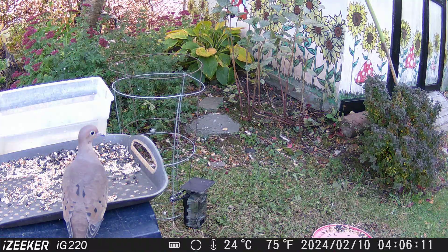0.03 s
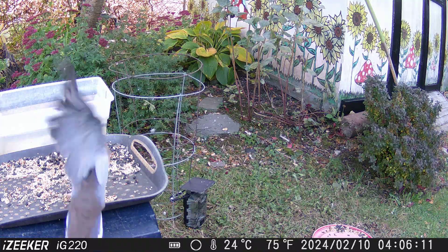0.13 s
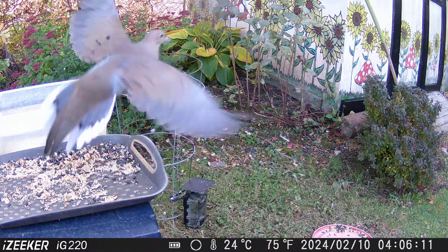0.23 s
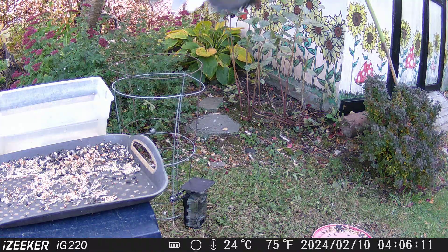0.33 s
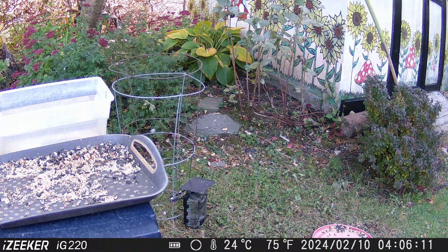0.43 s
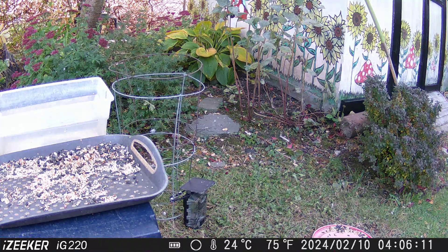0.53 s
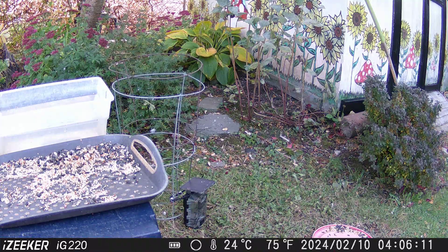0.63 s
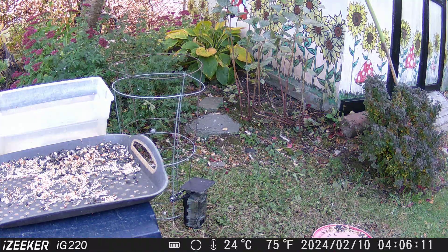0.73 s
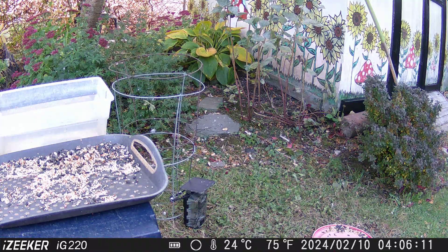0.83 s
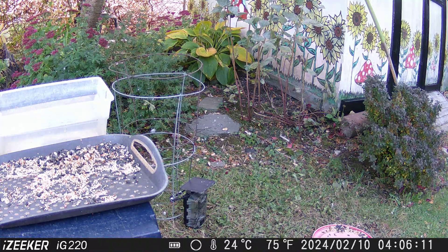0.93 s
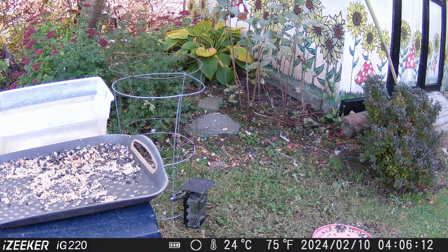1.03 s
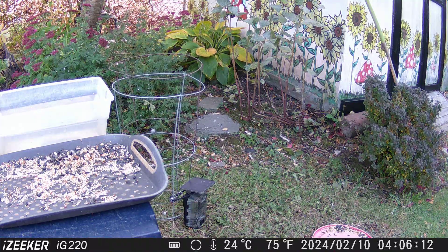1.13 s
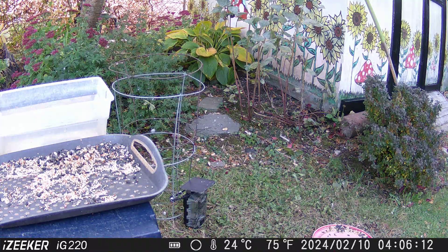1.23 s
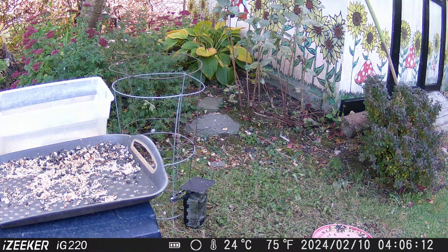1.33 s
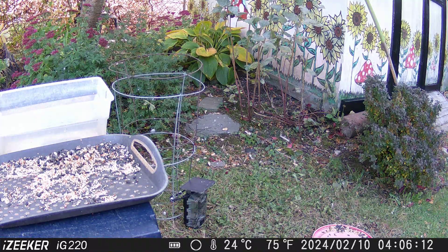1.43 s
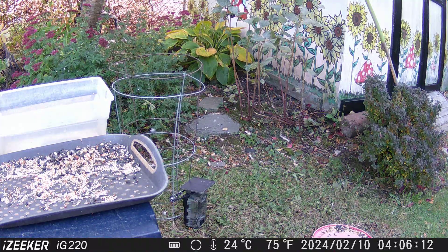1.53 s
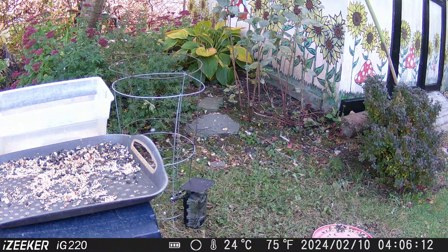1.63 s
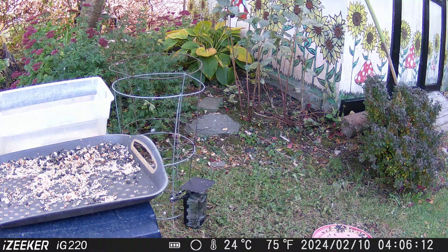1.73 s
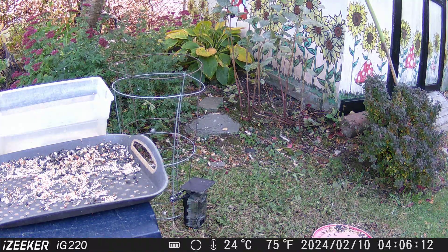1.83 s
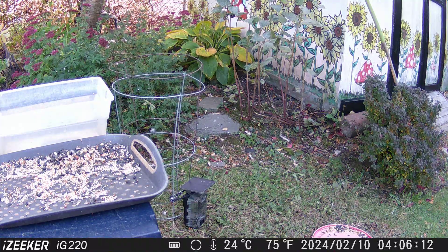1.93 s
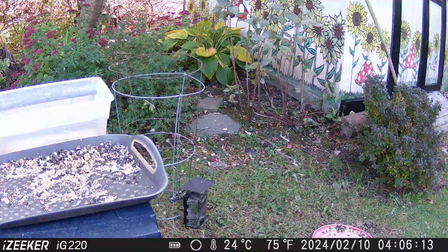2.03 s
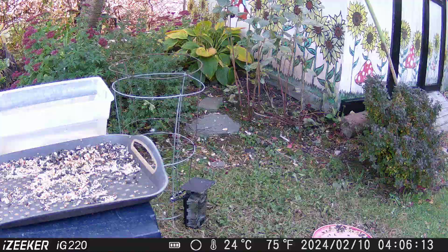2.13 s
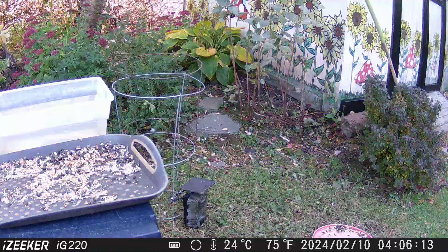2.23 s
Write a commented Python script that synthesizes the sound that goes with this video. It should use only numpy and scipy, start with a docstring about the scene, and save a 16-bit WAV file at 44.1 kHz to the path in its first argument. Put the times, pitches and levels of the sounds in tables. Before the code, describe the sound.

Dove wings flap hard right beside a small microphone in a garden, with claps, low air thuds, feather rustle and quick airy whistles, then the flutter recedes, leaving soft rumble and a few dull knocks.

```python
"""Doves leaving a garden feeder

Close to a small microphone, doves burst up from a garden feeder and fly off.
Wing strokes push low pressure pulses, feathers whistle in wavering harmonic tones, wing tips clap in noise.
Shaped noise makes the feather rustle and the outdoor rumble, part steady and part swelling;
decaying sines make dull thumps."""
import sys
import numpy as np
from scipy import signal
from scipy.fft import rfft, irfft
from scipy.io import wavfile
from scipy.ndimage import uniform_filter1d

SR = 44100
rng = np.random.default_rng(int(sys.argv[2]) if len(sys.argv) > 2 else 0)


def store_wav(level_fs):
    """Save 16-bit WAV to argv[1]."""
    pcm = np.round(np.clip(np.atleast_2d(level_fs), -1, 1) * 32767)
    wavfile.write(sys.argv[1], SR, pcm.T.astype(np.int16))


N = 101430  # samples, 2.3 s


def amp(db):
    """Amplitude factor for a level in dB."""
    return 10 ** (np.asarray(db) / 20)


def evened(x):
    """Scales to rms 1."""
    return x / np.sqrt(np.mean(x ** 2) + 1e-20)


def read(points, hz):
    """Reads a tone curve in dB, interpolated over log frequency."""
    f, value = np.transpose(points)
    return np.interp(np.log(hz + 1), np.log(f + 1), value)


def add(mix, start_s, sound):
    """Adds a sound in place, cut off at the end of the mix."""
    part = mix[max(round(start_s * SR), 0):][:len(sound)]
    part += sound[:len(part)]


def colour(x, points):
    """Filters by a tone curve in dB."""
    gain = amp(read(points, np.fft.rfftfreq(len(x), 1 / SR)))
    return irfft(rfft(x) * gain, len(x))


def drift(seconds):
    """Smooth random curve of rms 1, averaged twice over the given time."""
    size = max(round(seconds * SR), 2)
    once = uniform_filter1d(rng.standard_normal(N), size)
    return evened(uniform_filter1d(once, size))


def hiss(points, patch_db, flicker_db, size, bright_db=0):
    """Noise with drifting patches, a flicker shared by all bands and a tilt in dB per octave above 2 kHz."""
    hop = size // 4
    hz = np.fft.rfftfreq(size, 1 / SR)[:, None]
    real, imaginary, patches = rng.standard_normal((N // hop + 5, size // 2 + 1, 3)).T
    frames = real.shape[1]
    patches = uniform_filter1d(patches, size=6, axis=0)  # across frequency
    patches = evened(uniform_filter1d(patches, size=6, axis=1))  # across time
    flicker = evened(uniform_filter1d(rng.standard_normal(frames), size=3))
    bright = np.interp(np.arange(frames) * hop, np.arange(N), bright_db * np.ones(N))
    tilt = np.log2(np.maximum(hz / 2000, 1)) * bright
    level_db = read(points, hz) + patch_db * patches + flicker_db * flicker + tilt
    spectrum = (real + 1j * imaginary) * amp(level_db)
    return signal.istft(spectrum, nperseg=size, noverlap=size - hop)[1][:N]


# outdoor air around the feeder, relative tone curve: (pitch_hz, level_db)
AIR_TONE = [(20, -1.5), (60, -6), (150, -14.5), (260, -20), (500, -25), (1000, -22.5), (1600, -31),
            (2400, -33.5), (4500, -36), (9000, -51.5)]


def air():
    """Steady outdoor rumble: noise weighted to the lows."""
    return amp(-52) * evened(hiss(AIR_TONE, patch_db=2, flicker_db=-0.5, size=2048))


# swelling low outdoor rumble, level followed point to point: (start_s, level_db)
SWELL_LEVELS = [(0.0, -44), (0.15, -47), (0.36, -39), (0.51, -50), (0.72, -49.5), (1.0, -49.5),
                (1.26, -51.5), (1.48, -52.5), (1.73, -55.5), (1.91, -47), (2.06, -52), (2.2, -49.5),
                (2.3, -48)]
# relative tone curve of the swelling rumble: (pitch_hz, level_db)
SWELL_TONE = [(20, -3), (50, 3.5), (90, 1), (150, -8.5), (250, -17), (500, -39), (1000, -66)]


def swelling_rumble():
    """Outdoor rumble below about 200 Hz that rises and falls: low noise under a level curve."""
    start_s, level_db = np.transpose(SWELL_LEVELS)
    level = amp(np.interp(np.arange(N) / SR, start_s, level_db))
    return level * evened(hiss(SWELL_TONE, patch_db=.7, flicker_db=.7, size=2048))


# feather rustle of the flock, followed point to point: (start_s, level_db, brightness_db_per_octave)
RUSTLE_LEVELS = [(0, -62, 2), (.15, -60, 1.5), (.19, -50, 0), (.235, -51, -1.5), (.26, -39.5, -2),
                 (.29, -44, -2.5), (.33, -36, -6), (.36, -44, -3), (.4, -46, -3), (.45, -49, 1),
                 (.55, -60, 1.5), (.68, -50.5, -2), (.74, -42.5, -2.5), (.8, -52.5, -0.5), (.86, -36.5, -8),
                 (.94, -49.5, 0), (1.1, -50, 0.5), (1.3, -57, 0.5), (1.46, -59.5, 1), (1.6, -65.5, 1),
                 (1.8, -56, -2), (2.05, -59.5, -0.5), (2.18, -56.5, -1), (2.3, -72, 2.5)]
# relative tone curve of the rustle: (pitch_hz, level_db)
RUSTLE_TONE = [(60, 4.5), (200, 14.5), (600, -3.5), (1500, 1), (2400, -1), (4000, 1), (7000, 3.5),
               (9000, 11)]


def rustle():
    """Air through the feathers: noise that swells and shifts in brightness above 2 kHz."""
    start_s, level_db, bright_db = np.transpose(RUSTLE_LEVELS)
    t = np.arange(N) / SR
    sound = hiss(RUSTLE_TONE, patch_db=0.5, flicker_db=0, size=512, bright_db=np.interp(t, start_s, bright_db))
    return amp(np.interp(t, start_s, level_db)) * evened(sound)


# dull thumps: (start_s, pitch_hz, level_db before doubling and decay, t60_s)
THUMP_HITS = [(1.734, 158.4, -46.5, 0.11), (1.855, 71, -37, 0.067), (1.887, 205.3, -41.5, 0.089),
              (1.935, 214.5, -47, 0.19), (2.095, 83, -43.5, 0.12), (2.165, 478, -43.5, 0.054),
              (2.177, 203, -45, 0.21)]
THUMP_RISE_S = 0.0094


def thumps():
    """Soft low knocks that ring briefly: decaying sines with a soft rise."""
    t = np.arange(0, .3, 1 / SR)
    out = np.zeros(N)
    for start_s, hz, level_db, t60_s in THUMP_HITS:
        rise = np.minimum(t / THUMP_RISE_S, 1)
        add(out, start_s, amp(level_db - 60 * t / t60_s) * rise * 2 * np.sin(2 * np.pi * hz * t))
    return out


# wing claps: (start_s, crack_db before its tone curve, body_db relative to that, body_pitch_hz, burst_s)
CLAP_HITS = [(0.0295, -52, -15, 423, 0.0034), (0.161, -62, 2, 643, 0.0061), (0.1783, -56, 3, 468, 0.0083),
             (0.2004, -62, 10.5, 760, 0.0052), (0.215, -47, 10, 928, 0.0038),
             (0.2493, -50.5, 5.5, 807, 0.0027), (0.265, -52, 5, 610, 0.0097),
             (0.304, -56, 5.5, 577, 0.0031), (0.3242, -46, 7, 392, 0.0055),
             (0.3408, -39.5, -2, 435, 0.0022), (0.377, -41.5, -5.5, 680, 0.0036),
             (0.399, -56, -5, 484, 0.0063), (0.4202, -55, 8, 423, 0.003), (0.513, -56, -10, 431, 0.0036),
             (0.7133, -61, 7, 748, 0.0071), (0.741, -53, 4, 630, 0.0096), (0.7893, -49, -1, 686, 0.0046),
             (0.9153, -52.5, -2.5, 1027, 0.0053), (0.9487, -61, 9, 1280, 0.0024),
             (1.1066, -46.5, -16, 1090, 0.0023), (1.1835, -47, -2, 900, 0.0014),
             (1.279, -58, -10, 910, 0.0045), (1.4526, -56.5, 8, 549, 0.0052),
             (2.1682, -67.5, 15.5, 480, 0.012)]
# tone curve of the crack: (pitch_hz, level_db)
CRACK_TONE = [(800, 17), (1500, 5.5), (3000, 9), (6000, 8.5), (9000, 12.5)]
ECHO_DB, ECHO_T60_S = -8.5, 0.11  # garden echo
SNAP_DB, SNAP_RISE_S = 3, .0015  # unevenness and rise of the feather snaps
BODY_OCTAVES, BODY_RISE_S = 0.91, 0.0027  # half-width and rise of the body


def claps():
    """A cluster of feather snaps over a duller resonant body, followed by garden echoes."""
    t = np.arange(4096) / SR
    hz = np.fft.rfftfreq(len(t), 1 / SR)
    crack, body = np.zeros((2, N))
    for start_s, crack_db, body_db, body_hz, burst_s in CLAP_HITS:
        crack_noise, body_noise, snap_noise = rng.standard_normal((3, len(t)))
        shape = np.exp(-t / burst_s) + amp(ECHO_DB - 60 * t / ECHO_T60_S)
        snaps_db = SNAP_DB * evened(uniform_filter1d(snap_noise, size=30))
        crack_shape = shape * np.minimum(t / SNAP_RISE_S, 1)
        add(crack, start_s, amp(crack_db + snaps_db) * crack_shape * crack_noise)
        octaves_off = np.log2((hz + 1) / body_hz)
        band = evened(irfft(rfft(body_noise) / (1 + (octaves_off / BODY_OCTAVES) ** 4)))
        body_shape = shape * np.minimum(t / BODY_RISE_S, 1)
        add(body, start_s, amp(crack_db + body_db) * body_shape * band)
    return colour(crack, [(1, -61.5)] + CRACK_TONE) + body  # the crack has little bass


# feather whistles: (start_s, length_s before the closing fade time is added, level_db,
#   first_pitch_hz, last_pitch_hz, third_harmonic_db, other_wing_pitch_hz, other_wing_db relative, swell_db)
WHISTLE_NOTES = [(0.018, 0.0053, -58, 2430, 2480, -25, 2110, 3, 11),
                 (0.023, 0.028, -55, 2094, 2096, -26, 2330, -17, 3),
                 (0.051, 0.036, -60, 2186, 2163, -28, 2050, -16.5, -6),
                 (0.11, 0.036, -55.5, 2127, 2200, -20.5, 2050, -18, -4.5),
                 (0.154, 0.02, -58.5, 2230, 2050, -17, 2470, -9.5, -4),
                 (0.209, 0.014, -44, 2319, 2226, -24, 2393, -4.5, 4),
                 (0.251, 0.019, -50.5, 1623, 1710, -26, 1466, -6, -10),
                 (0.276, 0.022, -43, 2340, 2043, -17, 2450, -8, 12),
                 (0.325, 0.023, -59, 2400, 2320, -27, 1966, 2, -7),
                 (0.349, 0.024, -44, 2423, 2197, -18, 2560, -4.5, 0.5),
                 (0.396, 0.0077, -49.5, 1645, 1655, -31, 1435, -8, 2),
                 (0.397, 0.0069, -49.5, 2180, 2180, -10.5, 1940, -6, -4),
                 (0.429, 0.031, -49.5, 2244, 2443, -15.5, 2172, -1, -13.5),
                 (0.47, 0.011, -52, 1640, 1610, -32, 1460, -14, -0.5),
                 (0.491, 0.05, -60.5, 2456, 2443, -14.5, 2080, -2, 0),
                 (0.507, 0.024, -50.5, 2087, 2057, -22.5, 2025, -3.5, -15),
                 (0.582, 0.02, -61.5, 2350, 2490, -30, 1930, -8, -9),
                 (0.651, 0.022, -57.5, 2066, 2120, -20, 1800, -21, -6),
                 (0.684, 0.014, -64.5, 2360, 2360, -14, 2060, 4, -2),
                 (0.706, 0.011, -51.5, 1670, 1680, -48, 1410, -12, -4),
                 (0.734, 0.012, -49, 2295, 2496, -15.5, 2700, -4, -17),
                 (0.804, 0.015, -53.5, 2330, 2400, -15.5, 2270, -3, -2),
                 (0.83, 0.015, -62, 2140, 2040, -24, 1850, -6, -3),
                 (0.857, 0.0068, -61, 1570, 1580, -33, 1340, -14, -6.5),
                 (0.888, 0.031, -45, 2385, 2500, -13.5, 2140, -10.5, -2),
                 (0.934, 0.01, -55, 2280, 2220, -17, 2080, -3.5, 3.5),
                 (0.934, 0.012, -57, 1570, 1600, -35.5, 1403, -2, -4),
                 (0.968, 0.027, -46.5, 2288, 2476, -18, 2215, -14, -8),
                 (1.012, 0.013, -59, 1660, 1650, -26, 1360, -18, 2),
                 (1.015, 0.013, -62, 2210, 2040, -16, 2230, -16, -2),
                 (1.041, 0.031, -49, 2334, 2386, -12, 2470, -7, -16),
                 (1.08, 0.015, -57, 2254, 2330, -18, 1900, -20, -5),
                 (1.09, 0.0083, -61.5, 1645, 1680, -23, 1820, -7, 2),
                 (1.124, 0.011, -61, 2150, 2120, -23, 2300, -10, -11),
                 (1.167, 0.021, -64, 2012, 2130, -18, 1990, -5, -3),
                 (1.199, 0.028, -60, 2188, 2295, -12, 2090, -8.5, 0),
                 (1.243, 0.014, -60.5, 1640, 1640, -38, 1775, -5, 3),
                 (1.276, 0.017, -56.5, 2214, 2154, -17.5, 2353, 0.5, -12),
                 (1.31, 0.017, -61.5, 2260, 2030, -21, 2410, -9, 7),
                 (1.356, 0.031, -56.5, 2314, 2156, -20.5, 2060, -13, 1),
                 (1.405, 0.012, -66, 1620, 1720, -29, 1340, -11, -8),
                 (1.41, 0.016, -67, 2510, 2360, -26, 2010, -13.5, -5),
                 (1.442, 0.014, -58.5, 2280, 2324, -13.5, 2010, -15, -6.5),
                 (1.462, 0.02, -64.5, 2175, 1990, -15, 2350, -6, -9),
                 (1.528, 0.027, -73, 2000, 1940, -23.5, 2176, 11, -7),
                 (1.62, 0.011, -69, 2270, 2210, -21, 2054, 2, -2),
                 (2.013, 0.012, -66, 2126, 2080, -17, 2350, -10.5, -5),
                 (2.123, 0.0095, -61, 2210, 2400, -19, 2100, -21, -6)]
SECOND_DB = -12  # second harmonic
RISE_S, EDGE_S = .007, .009  # opening and closing fades
WOBBLE, WOBBLE_S = .014, 0.0046  # pitch waver as a share of the pitch; its smoothing time
FLUTTER_DB, FLUTTER_S = 3.5, 0.0019  # level flutter; its smoothing time
ARCH = .09  # greatest pitch dip at both ends, as a share of the pitch
BREATH_DB, BREATH_HZ = -8.5, 500  # airy edge
CLEAN_DB, ROUGH_DB, CLEAN_SHARE = -57, -45, .3  # quiet whistles are steadier, loud ones rough
RING_DB, RING_T60_S = -11.5, .1  # garden echo


def whistles():
    """One fluttering feather on each wing: a wavering, airy tone with two overtones, echoed by the garden."""
    chance = [(drift(WOBBLE_S), drift(FLUTTER_S), drift(.5 / BREATH_HZ)) for wing in range(2)]
    out = np.zeros(N)
    for start_s, length_s, db, first_hz, last_hz, third_db, other_hz, other_db, swell_db in WHISTLE_NOTES:
        t = np.arange(0, length_s + EDGE_S, 1 / SR)
        start = round(start_s * SR)
        at = slice(start, start + len(t))
        fade = np.clip(np.minimum(t / RISE_S, t[::-1] / EDGE_S), 0, 1)
        shape = np.sin(np.pi / 2 * fade) ** 2
        rough = np.interp(db, [CLEAN_DB, ROUGH_DB], [CLEAN_SHARE, 1])
        bend = 1 - rough * ARCH * (1 - shape)
        lift_db = -read(MIC_TONE, 3 * first_hz)  # offsets the microphone's response at the third harmonic
        swell = swell_db * (t / t[-1] - .5)
        wings = [(np.linspace(first_hz, last_hz, len(t)), 0), (other_hz, other_db)]
        for (hz, wing_db), (waver, flutter, airy) in zip(wings, chance):
            pitch_hz = hz * bend * (1 + rough * WOBBLE * waver[at])
            phase = 2 * np.pi * np.cumsum(pitch_hz) / SR
            tone = np.sin(phase) + amp(SECOND_DB) * np.sin(2 * phase)
            tone += amp(third_db + lift_db) * np.sin(3 * phase)
            level_db = db + wing_db + FLUTTER_DB * flutter[at] + swell
            breath = 1 + rough * amp(BREATH_DB) * airy[at]
            out[at] += amp(level_db) * shape * breath * tone
    t = np.arange(8192) / SR
    echo = rng.standard_normal(len(t)) * amp(-60 * t / RING_T60_S)
    return out + amp(RING_DB) * signal.oaconvolve(out, echo / np.linalg.norm(echo))[:N]


# wing strokes close by: (start_s where pressure crosses zero, level_db before pulse shaping, fall_s time scale)
STROKE_PULSES = [(0.176, -41.5, 0.0064), (0.191, -35.5, 0.0035), (0.226, -31, 0.019), (0.265, -25, 0.0067),
                 (0.296, -28.5, 0.015), (0.311, -25, 0.0095), (0.341, -23.5, 0.0067), (0.367, -26.5, 0.014),
                 (0.387, -29, 0.0125), (0.42, -29, 0.0069), (0.448, -33.5, 0.0093), (0.464, -38.5, 0.0064),
                 (0.5, -32.5, 0.0061), (0.549, -41.5, 0.0083), (0.657, -41, 0.011), (0.693, -51, 0.021),
                 (0.72, -39, 0.0075), (0.744, -36.5, 0.012), (0.768, -36.5, 0.013), (0.798, -35, 0.005),
                 (0.845, -34, 0.0086), (0.879, -35.5, 0.0057), (0.925, -38, 0.0086), (0.957, -38, 0.0054),
                 (1.004, -39.5, 0.0066), (1.036, -43, 0.0069), (1.078, -39.5, 0.0078), (1.114, -43, 0.0071),
                 (1.155, -41, 0.012), (1.188, -47, 0.012), (1.232, -45.5, 0.0051), (1.265, -49, 0.0081),
                 (1.313, -41.5, 0.0069), (1.366, -46.5, 0.011)]
BUILD_UP = 1.3  # build-up and recovery, in fall times


def strokes():
    """Pressure builds, drops sharply through zero as the wing turns, and recovers."""
    out = np.zeros(N)
    for start_s, level_db, fall_s in STROKE_PULSES:
        u = np.arange(-.1, .1, 1 / SR) / fall_s
        pulse = -2 * np.tanh(2 * u) * np.exp(-(u / BUILD_UP) ** 2)
        add(out, start_s - .1, amp(level_db) * pulse)
    return out


def scene():
    """All layers at the microphone, from the background to the wing strokes."""
    background = air() + swelling_rumble() + rustle() + thumps()
    return (background + claps() + whistles() + strokes())[None]


# small microphone in its housing: (pitch_hz, level_db)
MIC_TONE = [(1500, 1.5), (2400, 1), (2800, -7.5), (4500, -23), (5800, -16), (7200, -6), (8200, -19),
            (8900, -35.5)]
EDGE_HZ = 9000  # upper band limit


def record(dry):
    """Microphone colour, then the band limit."""
    heard = colour(dry[0], MIC_TONE)[None]
    low_pass = signal.firwin(511, EDGE_HZ, window=("kaiser", 9), fs=SR)
    return signal.oaconvolve(heard, low_pass[None], "same")


dry = scene()
out = record(dry)
store_wav(out)
```